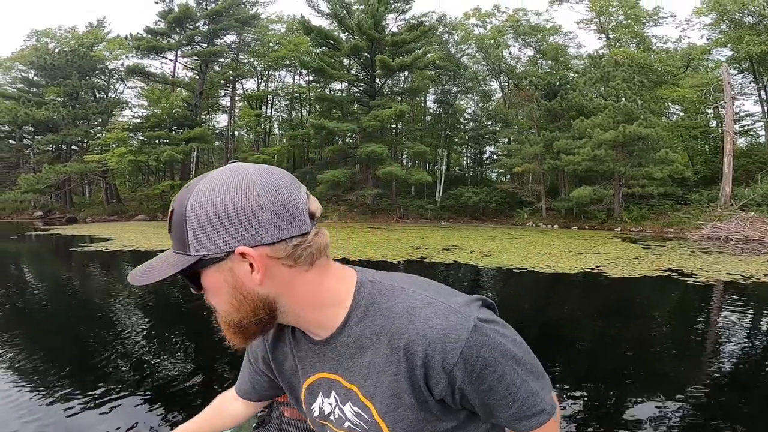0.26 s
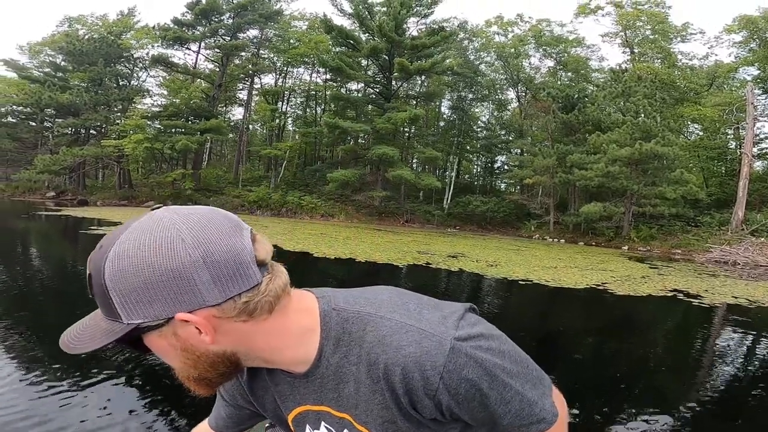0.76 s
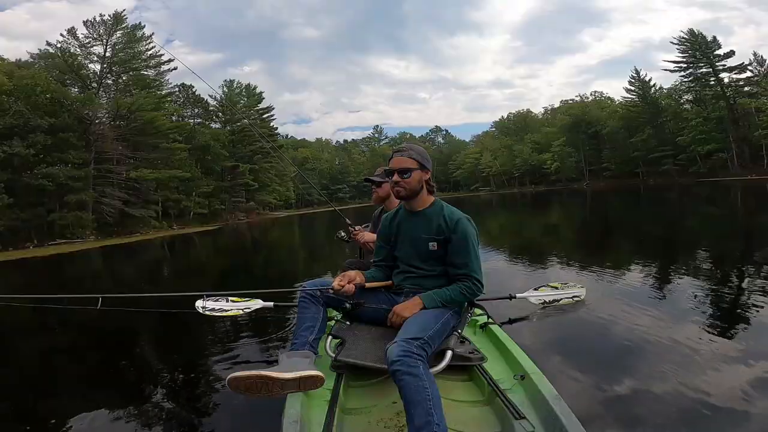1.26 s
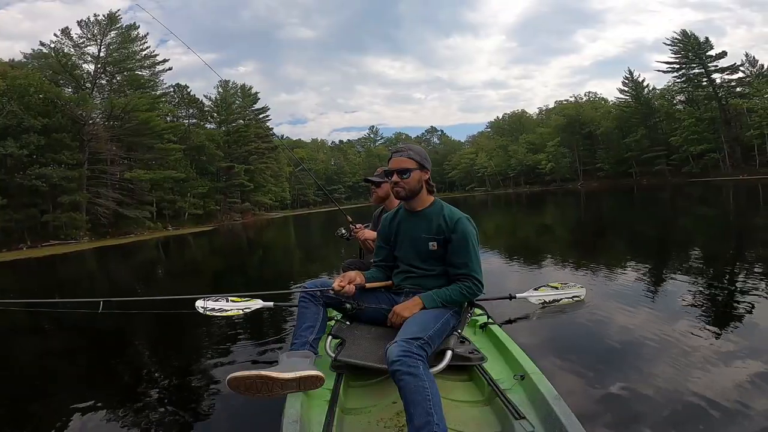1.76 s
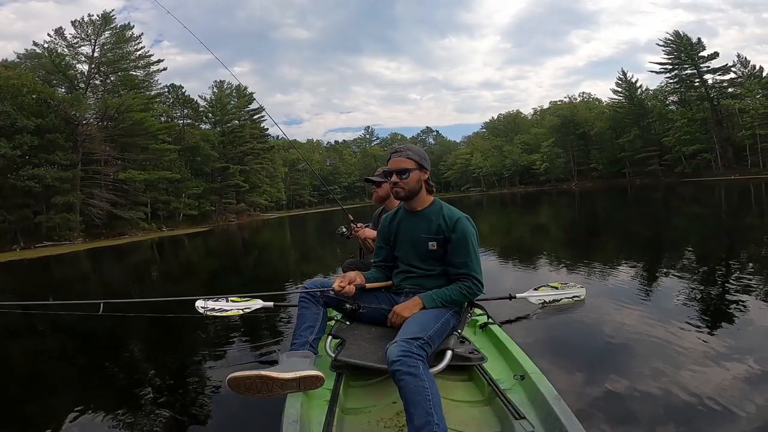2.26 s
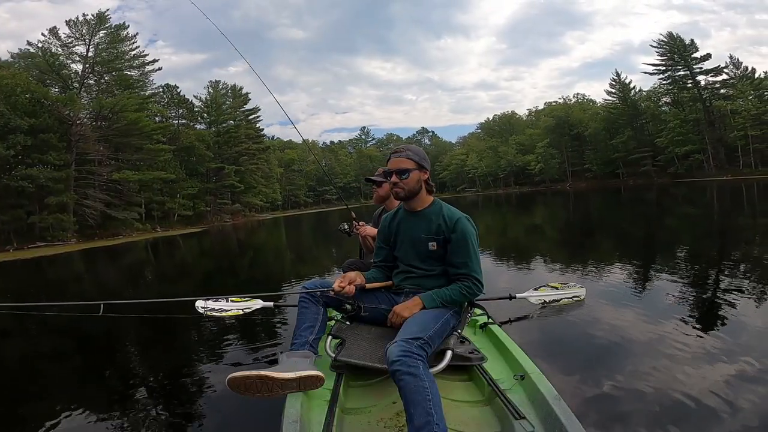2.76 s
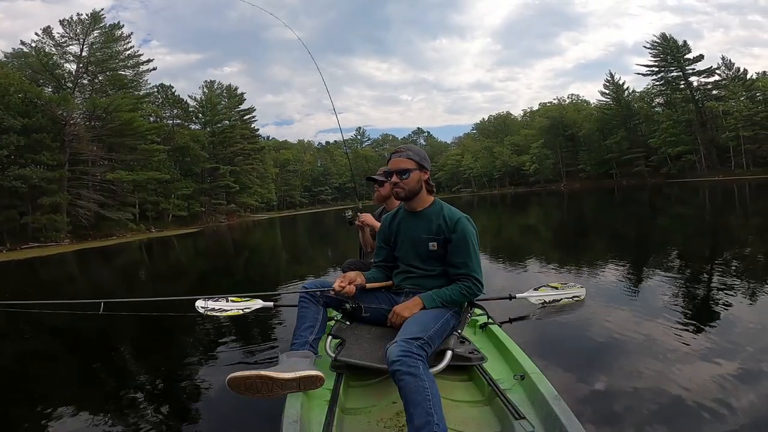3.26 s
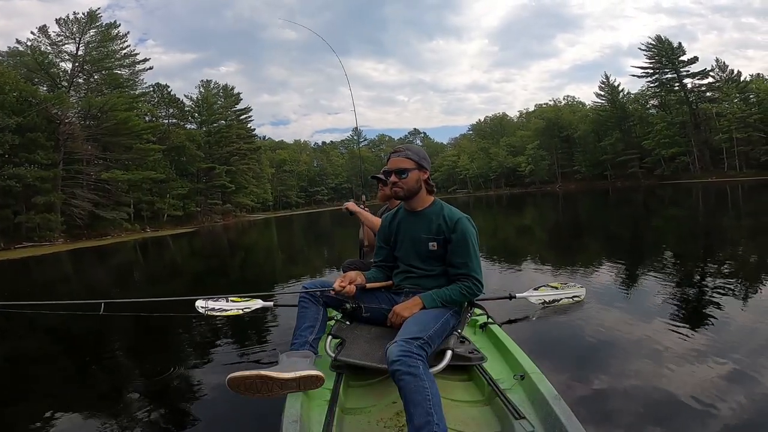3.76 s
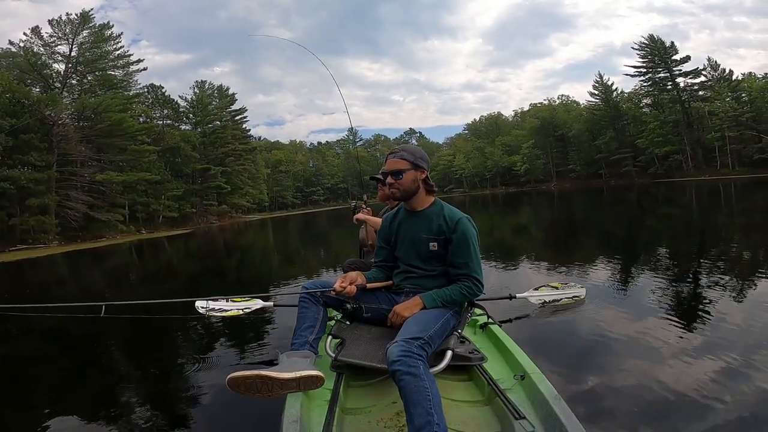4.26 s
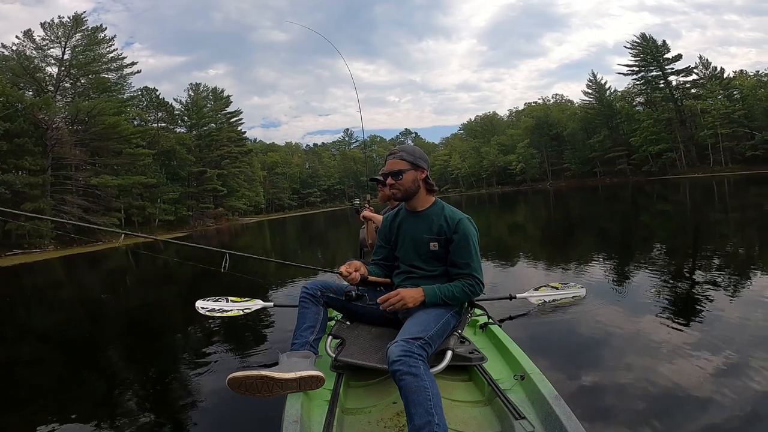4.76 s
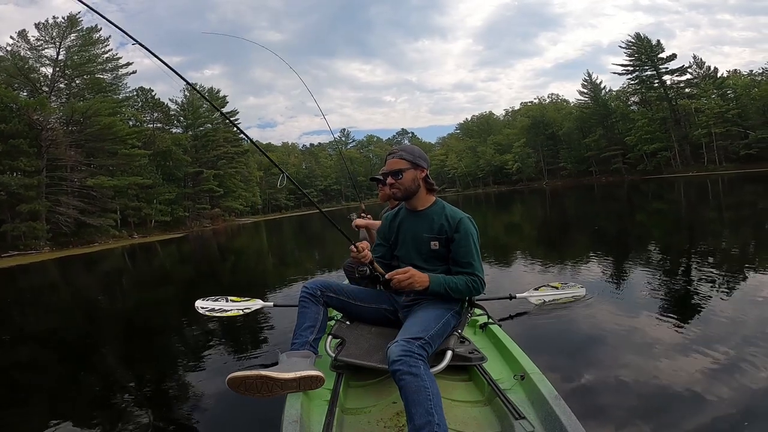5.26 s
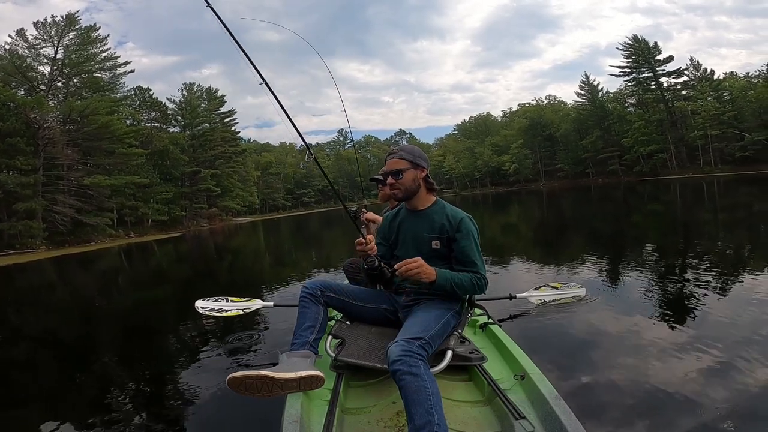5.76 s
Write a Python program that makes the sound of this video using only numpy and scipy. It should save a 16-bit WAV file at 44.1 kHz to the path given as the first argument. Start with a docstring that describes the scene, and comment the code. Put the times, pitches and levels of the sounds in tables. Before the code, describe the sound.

Close to the microphone, a hand and fish stir lake water beside a plastic kayak: dull hull bumps, bubbling slosh, then a sharp low plunge and a wet creak. An abrupt cut leads to quiet outdoor woods with a trilling cricket, faint bird chirps, a thin whistle and low wind puffs. Later a fishing reel clicks irregularly, line rasps through guides and tackle knocks on hollow plastic.

```python
"""Near scene: beside a plastic kayak on a still lake a hand lowers a fish into the water. The hull is bumped,
shaped noises surge, slosh and spray, gliding sines gurgle, the fish dives and wet skin creaks on the hull.
Farther scene, after a cut at 1.287 s: a trilling cricket, bird chirps and a thin whistle, low-noise wind puffs,
a reel whose pawl clicks and rings damped modes, line hissing through the rod guides, and tackle knocking on
hollow plastic. A steady hush of woods lies under both scenes."""
import sys
import numpy as np
from scipy import signal
from scipy.fft import rfft, irfft, next_fast_len
from scipy.io import wavfile
from scipy.ndimage import uniform_filter1d, map_coordinates

SR = 44100
rng = np.random.default_rng(int(sys.argv[2]) if len(sys.argv) > 2 else 0)


def to_wav(s):
    """Save 16-bit WAV."""
    ch = np.atleast_2d(s).T  # columns
    pcm = np.round(np.clip(ch, -1, 1) * 32767)  # PCM
    wavfile.write(sys.argv[1], SR, pcm.astype(np.int16))


N = 265305
T = np.arange(N) / SR
CUT_S = 1.287  # the near scene ends here


def amp(db):
    """Amplitude factor of a level in dB."""
    return 10 ** (np.asarray(db) / 20)


def unit(x):
    """Scale to an overall rms of 1."""
    return x / np.sqrt(np.mean(x ** 2) + 1e-20)


def along(points, hz):
    """Interpolate (Hz, value) points on a log frequency axis."""
    point_hz, value = np.transpose(points)
    return np.interp(np.log(hz + 1), np.log(point_hz + 1), value)


def curves(rows):
    """One value per sample for each column after the time."""
    time_s, *columns = np.transpose(rows)
    return [np.interp(T, time_s, column) for column in columns]


def wobble(rate_hz):
    """A smooth random curve with rate_hz knots a second."""
    knots = rng.standard_normal(int(N * rate_hz / SR) + 4)
    return map_coordinates(knots, [T * rate_hz])


def filtered(x, response):
    """Apply a response given as a function of frequency."""
    size = next_fast_len(x.shape[-1] + 8192)
    spectrum = rfft(x, size) * response(np.fft.rfftfreq(size, 1 / SR))
    return irfft(spectrum, size)[..., :x.shape[-1]]


def noise(spectrum, patchy_db):
    """Two unrelated noises, joint rms 1, that share time-frequency patches of random gain."""
    z = signal.stft(rng.standard_normal((2, N + 512)), nperseg=512)[2]
    field = uniform_filter1d(rng.standard_normal(z.shape[1:]), size=5, axis=0)
    field = uniform_filter1d(field, size=7, axis=1)
    pair = signal.istft(z * amp(patchy_db * unit(field)), nperseg=512)[1][:, :N]
    return unit(filtered(pair, lambda hz: amp(along(spectrum, hz))))


def spread(pair, alike):
    """Mix two noises into left and right with the given (Hz, likeness)."""
    def mid_side(hz):
        angle = np.arccos(np.clip(along(alike, hz), -1, 1)) / 2
        return np.array([np.cos(angle), np.sin(angle)])

    mid, side = filtered(pair, mid_side)
    return np.array([mid + side, mid - side])


def grainy(depth_db, rate_hz):
    """A fast spiky gain of rms 1: drops and slips stand out of the noise."""
    return unit(amp(depth_db * wobble(rate_hz)))


def place(x, pan_db, lag=0):
    """Left and right of one source: pan_db is left over right, left lags by some samples."""
    return np.array([np.roll(x, lag) * amp(pan_db / 2), x * amp(-pan_db / 2)])


def add(out, start_s, x):
    """Mix x into out at start_s."""
    part = out[..., round(start_s * SR):][..., :x.shape[-1]]
    part += x[..., :part.shape[-1]]


def ring(modes, t, scatter_db, attack_s):
    """Sum of damped (Hz, dB, t60 s) modes, struck at new strengths each time."""
    total = np.zeros(len(t))
    for hz, db, t60_s in modes:
        struck_db = db + scatter_db * rng.standard_normal()
        total += amp(struck_db - 60 * t / t60_s) * np.sin(2 * np.pi * hz * t)
    return total * (1 - np.exp(-t / attack_s))


def burst(spectrum, t60_s, tilt_db, alike, attack_s):
    """A decaying stereo puff of coloured noise; tilt_db per octave bends the treble."""
    t = np.arange(SR // 8) / SR

    def colour(hz):
        return amp(along(spectrum, hz) + tilt_db * np.log2(hz / 3000 + 0.39))

    mid, side = filtered(rng.standard_normal((2, len(t))), colour)
    side = (1 - alike) * side
    mix = unit(np.array([mid + side, mid - side]))
    return mix * amp(-60 * t / t60_s) * (1 - np.exp(-t / attack_s))


def water():
    """Surge, slosh and spray of the stirred surface, with ringing air pockets, slaps and a steady hiss."""
    # relative spectra: hz, level_db
    surge_spectrum = [(15, -32), (25, -15), (92, -3.5), (214, -9), (303, -7.5), (400, -21), (520, -48),
                      (880, -120)]
    slosh_spectrum = [(88, -22), (150, -1.5), (306, 5), (648, -8), (821, -10), (1140, -18), (1510, -8),
                      (3500, -16.5), (4550, -28), (7700, -120)]
    spray_spectrum = [(1180, -38), (2000, -7), (2450, -5.5), (2790, -7), (4200, -9), (5530, -10.5),
                      (6950, -13.5), (12300, -35.5), (14000, -60)]
    slap_spectrum = [(240, -42.5), (400, 2.5), (676, -14), (1580, -2.5), (2430, -7.5), (2750, -11),
                     (3580, -5), (5430, -12), (7510, -16.5), (16000, -47.5)]
    hiss_spectrum = [(3000, -80), (3650, -14), (3900, 0), (4400, -1), (4800, -16), (6000, -80)]  # near 4 kHz
    # left-right likeness: hz, likeness
    water_alike = [(60, 0.88), (240, 1), (950, 0.45), (3770, 0.48), (15000, 0.087)]
    # air pockets that ring as they close: start_s, level_db, pitch_hz, relative pitch rise per t60, t60_s
    bubbles = [(0.214, -44, 192, -0.0089, 0.11), (.27, -52, 737, -0.27, 0.22),
               (.335, -40, 595, 0.39, 0.064), (.355, -35.5, 1147, 0.34, 0.051),
               (.430, -29.5, 327.4, 0.079, 0.38), (.430, -39.5, 307.3, 0.046, 0.46),
               (.518, -42, 362, -0.052, 0.092), (.555, -45, 774, 0.11, 0.13),
               (0.595, -32, 1250, 0.77, 0.033), (.684, -25.5, 440, -0.035, 0.071),
               (.73, -48, 445, 0.32, 0.3), (.796, -43.5, 723, 1.6, .04), (.81, -39.5, 1260, 0.47, 0.047),
               (.82, -35.5, 3200, 0.46, 0.019), (.885, -24.5, 1070, -0.077, 0.035),
               (.886, -14.5, 165.7, -0.18, 0.087), (0.912, -16.5, 103.4, -0.24, 0.1),
               (.935, -28, 279, 0.31, 0.079), (0.938, -14, 69, -0.63, 0.063), (0.967, -14, 47, .3, 0.092),
               (1.071, -45, 300, 0.041, 0.18)]
    # tail and hand slap the surface: start_s, level_db, treble_db_per_octave
    slaps = [(0.0144, -31, -8), (0.1496, -45.5, -0.5), (0.3432, -38.5, -12.5), (0.39, -43, -5.5),
             (0.4155, -46, -6), (0.4284, -31, -5.5), (0.4444, -40.5, -8), (0.4733, -40, -7.5),
             (0.5177, -34.5, -5), (0.5503, -39.5, -7), (0.5781, -42.5, -7), (0.6814, -37, -7.5),
             (0.8748, -42, -2), (0.8837, -29.5, -6.5), (0.9102, -18, 1.5), (0.9785, -36.5, -5),
             (1.008, -46, 0.5), (1.0748, -44.5, -1), (1.0855, -44, -1), (1.1094, -51, 1)]
    hiss_db, slap_t60_s = -64.5, 0.042

    surge, slosh, spray = stirring()
    bed = surge * noise(surge_spectrum, patchy_db=5.0)
    bed += slosh * grainy(depth_db=0.5, rate_hz=38) * noise(slosh_spectrum, patchy_db=4.5)
    bed += spray * grainy(depth_db=1.0, rate_hz=230) * noise(spray_spectrum, patchy_db=2.5)
    bed += amp(hiss_db) * noise(hiss_spectrum, patchy_db=2.0)
    out = spread(bed, water_alike) * amp([[1.2], [-1.2]])
    small_bubbles = gurgle(count=1200, median_hz=1510, cycles=8.1, scatter_db=2.0)
    out += place(amp(-3.5) * slosh * small_bubbles, pan_db=5.0)

    t = np.arange(SR // 4) / SR
    for start_s, db, hz, rise, t60_s in bubbles:
        # the pocket shrinks or opens, its pitch glides
        phase = 2 * np.pi * hz * (t + rise * t * t / (2 * t60_s))
        tone = amp(db - 60 * t / t60_s) * np.sin(phase) * (1 - np.exp(-t * hz / 0.5))
        add(out, start_s, place(tone, pan_db=2.1))
    for start_s, db, treble_db in slaps:
        slap = burst(slap_spectrum, slap_t60_s, treble_db, alike=0.55, attack_s=0.00053)
        add(out, start_s, amp(db) * slap * amp([[1.3], [-1.3]]))
    return out * np.clip((CUT_S - T) / 0.013, 0, 1)


def stirring():
    """Gains of surge, slosh and spray: one stirring level, the dive and the swell after it."""
    # hand and fish work the surface: time_s, slosh_db
    stir_levels = [(0, -63), (.13, -67.5), (.3, -55), (.41, -53), (.52, -54.5), (.6, -46), (.67, -45.5),
                   (.72, -56), (.86, -61), (1.04, -69), (1.09, -53.5), (1.17, -58.5), (1.25, -55.5)]
    # level at a slosh of -55 dB; dB per dB of slosh
    surge_db, surge_follows = -63, 0.27
    spray_db, spray_follows = -61, 0.21
    dive_s, rise_s = 0.89, 0.011  # full strength; time to rise 20 dB
    dive_levels = [(-26, 0.26), (-39, 0.4), (-48, 0.55)]  # surge, slosh, spray: peak_db, t60_s
    swell_db, swell_t60_s = -40.5, 1.38  # the low surge rolls on

    slosh_db, = curves(stir_levels)
    above_db = slosh_db + 55
    stir = amp([surge_db + surge_follows * above_db, slosh_db, spray_db + spray_follows * above_db])
    after_s = np.maximum(T - dive_s, 0)
    rise_db = 20 * np.minimum(T - dive_s, 0) / rise_s
    dive = amp([db + rise_db - 60 * after_s / t60_s for db, t60_s in dive_levels])
    swell = amp(swell_db + rise_db - 60 * after_s / swell_t60_s)
    return np.hypot(stir, dive + swell * [[1], [0], [0]])


def gurgle(count, median_hz, cycles, scatter_db):
    """Many small bubbles of rising pitch at chance times and pitches, rms 1 over the near scene."""
    draw, t = rng.random((count, 3)), np.arange(1024) / SR
    pitch_hz = median_hz * np.exp(0.536 * rng.standard_normal((count, 1)))
    turns = pitch_hz * t
    strength = amp(-scatter_db * np.log(draw[:, 1:2]))
    envelope = turns * np.exp(-3 * turns / cycles)
    tones = strength * np.sin(2 * np.pi * turns * (1 + 0.11 * turns / cycles)) * envelope
    where = (draw[:, :1] * CUT_S * SR).astype(int) + np.arange(len(t))
    total = np.bincount(where.ravel(), tones.ravel(), N)
    return total / np.std(total[:int(CUT_S * SR)])


def hull():
    """Dull noise bumps with a hard edge, and a creak of stick-slip pulses that push to and fro in turn."""
    # bumps: start_s, level_db, left_over_right_db, t60_s, hard_edge_db re level
    bumps = [(.011, -29.5, 3, 0.1, -13), (0.153, -32, 2.5, 0.096, -22), (3.009, -48.5, -1, 0.13, 2.5)]
    # relative spectra of hull, hard edge and creak: hz, level_db
    hull_spectrum = [(60, -44), (110, -11.5), (300, 7.5), (520, 3.5), (990, -18), (1460, -15.5),
                     (2300, -11.5), (3100, -24.5), (5000, -21), (8000, -72)]
    edge_spectrum = [(300, -22), (450, -3), (900, 1), (1300, -6), (2400, -18), (6000, -31), (10000, -60)]
    creak_spectrum = [(400, -20), (570, 5), (700, -10), (1150, 8), (1530, 5), (1790, -12), (2000, 7),
                      (2250, 8), (2450, -4), (2800, 2), (3600, -5), (4100, -16), (7000, -22), (10000, -36)]
    # wet skin rubs on the hull: start_s, end_s, first_db, growth_db_per_s
    creaks = [(1.07, 1.145, -58, -20), (1.178, 1.287, -58, 30)]
    slips_per_s, fade_s = 234.5, 0.014

    out = np.zeros((2, N))
    for start_s, db, pan_db, t60_s, hard_db in bumps:
        sides = amp([[pan_db / 2], [-pan_db / 2]])
        dull = burst(hull_spectrum, t60_s, tilt_db=-1.5, alike=0.88, attack_s=0.0014)
        edge = burst(edge_spectrum, t60_s=0.057, tilt_db=-0.5, alike=0.73, attack_s=0.00029)
        add(out, start_s, amp(db) * dull * sides)
        add(out, start_s, amp(db + hard_db) * edge * sides)

    rub = np.zeros(N)
    for start_s, end_s, db, growth_db in creaks:
        fade = np.clip(np.minimum(T - start_s, end_s - T) / fade_s, 0, 1)
        rub += amp(db + growth_db * np.clip(T - start_s, 0, end_s - start_s)) * fade
    slip_count = np.floor(np.cumsum(slips_per_s * (1 + 0.004 * wobble(80))) / SR)
    slips = np.diff(slip_count, prepend=0)
    pushes = slips * (-1) ** np.cumsum(slips) * amp(2 * rng.standard_normal(N))

    def smear(hz):  # the higher, the later
        return amp(along(creak_spectrum, hz)) * np.exp(-1j * hz * hz / 2100000.0)

    return out + place(rub * unit(filtered(pushes, smear)), pan_db=6.0)


def reel():
    """The pawl snaps over a tooth and rings the spool until the next tooth damps it."""
    # spool modes: pitch_hz, level_db, t60_s
    spool_low = [(4060, -5, 0.12), (4227, 1, 0.23)]
    spool_high = [(6390, 2.5, 0.38), (6630, -2, 0.22), (10600, -14, 0.16)]
    # relative click spectrum: hz, level_db
    pawl_spectrum = [(1180, -59), (2000, -45), (2550, -10), (3680, -12.5), (4260, -5), (5350, -4.5),
                     (7060, 2), (9330, -18.5), (11900, -14), (16000, -37)]

    out, t = np.zeros((2, N)), np.arange(SR // 3) / SR
    strokes = teeth()
    ends_s = [row[0] for row in strokes[1:]] + [N / SR]
    for (start_s, db, low_db, high_db), end_s in zip(strokes, ends_s):
        damp = amp(-25 * np.clip((t - (end_s - start_s)) / 0.0052, 0, 1))
        tone = amp(low_db) * ring(spool_low, t, scatter_db=1.5, attack_s=0.00043)
        tone += amp(high_db) * ring(spool_high, t, scatter_db=3.5, attack_s=0.0016)
        add(out, start_s, place(tone * damp, pan_db=-3.0, lag=1))
        click = burst(pawl_spectrum, t60_s=0.0075, tilt_db=0.0, alike=0.44, attack_s=0.00044)
        add(out, start_s, amp(db) * click * amp([[-3.2], [3.2]]))
        boat_answer = burst(pawl_spectrum, t60_s=0.025, tilt_db=-4.5, alike=0.57, attack_s=0.00028)
        add(out, start_s, amp(db - 11.5) * boat_answer)
    return out


def teeth():
    """All pawl strokes in time order: single teeth, and even runs that grow louder as the spool spins."""
    # single teeth: start_s, click_db, low_ring_db, high_ring_db
    clicks = [(3.397, -57, -90, -90), (3.4341, -37, -61, -55), (3.5227, -35.5, -52, -63.5),
              (3.75, -35.5, -64.5, -62.5), (3.8634, -38.5, -57.5, -61.5), (3.9433, -36.5, -50, -80),
              (3.9544, -43, -49.5, -70), (3.9804, -45, -58, -80), (3.9955, -35, -62, -66),
              (4.0217, -53, -66, -65), (4.0464, -34, -57, -54.5), (4.1274, -35, -48.5, -58),
              (4.1554, -55, -66, -72), (4.2038, -36, -52.5, -70), (4.2378, -51, -78, -74),
              (4.2778, -35.5, -66, -68), (4.4071, -35, -64, -61), (4.4573, -36.5, -55, -62),
              (4.616, -43, -58.5, -54), (4.8192, -38, -75, -82), (4.881, -35.5, -62, -68),
              (4.9322, -33.5, -52, -58), (4.9833, -32, -53, -53.5), (5.0194, -46, -64, -61),
              (5.0442, -48, -78, -64), (5.208, -34, -46.5, -54), (5.4213, -37, -52.5, -59.5),
              (5.5019, -40, -63, -70), (5.5648, -36, -54, -64), (5.5864, -46, -60, -77),
              (5.6027, -46, -60, -71), (5.6328, -34, -54.5, -65), (5.9582, -47, -77, -81)]
    # even runs: first_s, last_s, first_db, last_db, low_ring_db, high_ring_db
    even_runs = [(4.312, 4.383, -34.5, -32, -51.5, -55), (5.356, 5.4024, -54, -39, -73, -71)]
    run_teeth = (6, 5)

    strokes = list(clicks)
    for (first_s, last_s, first_db, last_db, low_db, high_db), count in zip(even_runs, run_teeth):
        times_s = np.linspace(first_s, last_s, count)
        levels_db = np.linspace(first_db, last_db, count)
        strokes += [(start_s, db, low_db, high_db) for start_s, db in zip(times_s, levels_db)]
    return sorted(strokes)


def line():
    """Wet line rasps through the guides while the pawl skims small teeth at chance moments."""
    # relative spectra of rasp and skims: hz, level_db
    guide_spectrum = [(700, -48), (1200, -15.5), (2000, -4.5), (2800, 0), (3600, -4.5), (4300, -0.5),
                      (5300, -7.5), (6700, -2.5), (8100, -18.5), (10900, -19.5), (13500, -30), (14200, -60)]
    skim_spectrum = [(2000, -40), (3500, -14), (5500, -6), (6900, 0), (8000, -10), (9500, -24),
                     (13000, -34), (15000, -60)]
    # pulls: start_s, full_speed_s, slowing_s, end_s, full_speed_db
    pulls = [(3.717, 3.952, 4.287, 4.54, -56), (4.69, 5.064, 5.53, 5.596, -57)]
    pull_range_db = 20.5  # start and end lie this far under full speed
    skims_per_s, skim_scatter_db, skim_db = 90, 3.5, -7  # skim_db: against the rasp

    rasp = grainy(depth_db=2, rate_hz=230) * noise(guide_spectrum, patchy_db=3.0)
    rasp = spread(rasp, [(1400, 0.69), (3000, 0.86), (7000, 0.29)]) * amp([[-2.2], [2.2]])
    strength = amp(skim_scatter_db * np.clip(rng.standard_normal(N), -2, 2))
    ticks = (rng.random(N) < skims_per_s / SR) * strength
    snap = burst(skim_spectrum, t60_s=0.006, tilt_db=0, alike=0.63, attack_s=0.0002) * amp([[-3], [3]])
    skims = unit(signal.fftconvolve(ticks[None], snap, axes=1)[:, :N])
    speed = np.zeros(N)
    for *times_s, db in pulls:
        under_db = pull_range_db * (np.interp(T, times_s, [0, 1, 1, 0]) - 1)
        speed += amp(db + under_db) * (T > times_s[0]) * (T < times_s[-1])
    return speed * amp(0.83 * wobble(8)) * (rasp + amp(skim_db) * skims)


def tackle():
    """A knock lands, bounces 3.3 ms later and rings the plastic; hard contacts wake the modes above 3 kHz."""
    # knocks on hollow plastic: start_s, level_db, brightness_db, bounce_db re first touch
    knocks = [(3.786, -51, -4, 5), (4.7033, -36, -2, -1), (4.7498, -45.5, -7, -9),
              (4.829, -35.5, -8.5, 2.5), (5.0952, -59, 1, 7.5), (5.1642, -41.5, -33, -3.5),
              (5.2068, -41.5, -29, 6), (5.2504, -39, -33, 1.5)]
    # plastic modes: pitch_hz, level_db, t60_s
    plastic_modes = [(330, -15, .05), (420, -13, .05), (560, -15, .045), (950, -13, .04), (1235, -10, .045),
                     (1340, -10, .04), (1522, 0, .062), (1620, -1, .05), (1825, 0, .05), (1950, -3, .04),
                     (2390, -6, .04), (2600, -10, .03), (2760, -10, .03), (3645, -2, .03), (4300, 1, .025),
                     (5190, -9, .025)]
    # soft scuffs of gear: start_s, level_db, t60_s, treble_db_per_octave
    scuffs = [(3.659, -49.5, 0.047, 6), (3.7868, -37.5, 0.054, 1), (4.104, -50.5, 0.05, -27),
              (4.429, -52.5, 0.078, -31), (4.544, -51.5, 0.069, -28), (4.6215, -42.5, 0.085, 2.5),
              (4.76, -42, 0.046, 10.5), (5.77, -47.5, 0.039, 11.5), (5.7766, -52, 0.042, 5)]
    # small pings of gear: start_s, level_db, pitch_hz, t60_s
    pings = [(4.108, -53, 1164, 0.079), (4.762, -35.5, 4240, 0.024), (5.478, -39, 1517, 0.067),
             (5.603, -34, 2990, 0.014), (5.777, -42, 3440, 0.016), (5.96, -60.5, 1296, .4)]
    # relative spectra of the hull's answer and the scuffs: hz, level_db
    clack_spectrum = [(200, -63), (350, 2.5), (800, -15), (1600, 7.5), (2500, -6), (4500, -20.5),
                      (9000, -33.5), (14000, -70)]
    scuff_spectrum = [(300, -24), (900, -6.5), (1500, 6.5), (4000, 0), (8000, -19.5), (14000, -57)]
    clack_db = 4  # hull's answer re knock

    out, t = np.zeros((2, N)), np.arange(SR // 8) / SR
    for start_s, db, bright_db, bounce_db in knocks:
        for delay_s, touch_db in ((0, db), (0.0033, db + bounce_db)):
            modes = [(hz * (1 + 0.013 * rng.standard_normal()), level_db + bright_db * (hz > 3000), t60_s)
                     for hz, level_db, t60_s in plastic_modes]
            tone = ring(modes, t, scatter_db=2.5, attack_s=0.0015)
            add(out, start_s + delay_s, amp(touch_db) * place(tone, pan_db=-1.0, lag=2))
        clack = burst(clack_spectrum, t60_s=0.088, tilt_db=-0.5, alike=0.72, attack_s=0.0014)
        add(out, start_s, amp(db + clack_db) * clack)
    for start_s, db, t60_s, treble_db in scuffs:
        scuff = burst(scuff_spectrum, t60_s, treble_db, alike=0.6, attack_s=0.00066)
        add(out, start_s, amp(db) * scuff)
    for start_s, db, hz, t60_s in pings:
        ping = ring([(hz, db, t60_s)], t, scatter_db=0.5, attack_s=0.00058)
        add(out, start_s, place(ping, pan_db=1.5, lag=2))
    return out


def bird():
    """Four gliding sine chirps and one thin, mostly rising whistle, far off."""
    # whistle: time_s, pitch_hz, level_db
    whistle = [(1.74, 3560, -86), (1.78, 3520, -85), (1.86, 3600, -90), (1.95, 3830, -81),
               (2.05, 3890, -77), (2.2, 4120, -78), (2.35, 4185, -80), (2.5, 4130, -87)]
    # chirps: start_s, start_hz, end_hz, length_s
    chirps = [(1.528, 4420, 4400, .03), (1.548, 4300, 3950, .015), (1.608, 4600, 4580, 0.027),
              (1.68, 4050, 3750, 0.028)]

    pitch_hz, level_db = curves(whistle)
    sounding = (T > whistle[0][0]) & (T < whistle[-1][0])
    gain = sounding * np.sqrt(2) * amp(level_db + 2.0 * wobble(29.8))
    tone = gain * np.sin(2 * np.pi * np.cumsum(pitch_hz) / SR)
    for start_s, start_hz, end_hz, length_s in chirps:
        glide_hz = np.linspace(start_hz, end_hz, int(length_s * SR))
        chirp = np.hanning(len(glide_hz)) * np.sin(2 * np.pi * np.cumsum(glide_hz) / SR)
        add(tone, start_s, amp(-72) * chirp)
    return place(tone, pan_db=3.0, lag=2)


def cricket():
    """74.1 wing strokes a second in phrases of seven, each sliding down in pitch, over a far chorus."""
    # strength of the seven strokes of a phrase: level_db
    wingbeats = [-18, 2, -8, 3, -1, 1.5, 2.5]
    # relative spectrum of far crickets: hz, level_db
    chorus_spectrum = [(4000, -90), (4700, -40), (5100, -16), (5380, -8), (5550, 0), (5750, -8),
                       (6100, -32), (7000, -90)]
    left_lead_rad = 2.65

    strokes = (T - 1.4405) * 74.1
    number, within = np.floor(strokes).astype(int), strokes % 1
    first = number.min()
    chance = rng.standard_normal((number.max() - first + 1, 2))[number - first]
    shape = np.sin(np.pi * np.clip(within / 0.85, 0, 1)) ** 2
    stroke_db = np.array(wingbeats)[number % len(wingbeats)]
    gain = amp(stroke_db + 1.9 * chance[:, 0] + 0.64 * wobble(1.0))
    phase = 2 * np.pi * np.cumsum(5900 - 800 * within) / SR + 1.2 * chance[:, 1]
    tone = np.sin(phase + left_lead_rad * np.array([[0.5], [-0.5]]))
    trill = amp(-62.0) * gain * shape * tone * amp([[1.2], [-1.2]])
    far = amp(-80) * noise(chorus_spectrum, patchy_db=0.7)[0]  # many more blur into a shimmer ahead
    return (trill + far) * (T > CUT_S)


def air():
    """Steady noise hush of the woods; after the cut, low-noise wind puffs that differ left to right."""
    # relative spectra of the woods from ahead and from the sides: hz, level_db
    ahead_spectrum = [(59, -49), (100, -13.5), (118, -27), (136, -3.5), (164, -0.5), (491, -12),
                      (545, -15.5), (1030, -14), (3160, -25), (5000, -28), (6380, -32.5), (12100, -48.5),
                      (12900, -44), (13400, -84)]
    side_spectrum = [(59, -65), (100, -25), (113, -24), (171, -2.5), (339, -14), (491, -14), (600, -20),
                     (1010, -18), (4050, -30), (5000, -30), (6380, -36), (11900, -48), (12900, -47.5),
                     (13400, -85)]
    # balance of the woods: hz, left_over_right_db
    woods_balance = [(60, 1), (240, -5), (950, -3), (3770, 5.5), (15000, -2)]
    # strong puffs: peak_s, level_db, left_over_right_db
    gusts = [(2.812, -43, 13.5), (3.85, -57, 8), (4.37, -53.5, 8), (4.77, -56, 11), (5.25, -63, 7),
             (5.38, -62.5, 16), (5.86, -55, 7.5)]
    # relative spectrum of the thumps: hz, level_db
    thump_spectrum = [(30, -29), (60, 3.5), (100, -5.5), (150, -45), (200, -120)]
    woods_db, breeze_db, lumpy_db = -65, -70.5, 6.5  # lumpy_db: swing of the breeze
    gust_db_per_s = 211  # slope of rise and fall
    thump_from_db, thump_growth = -32.5, 1.8  # level where thumps match the puff; dB per dB

    mid = amp(woods_db) * noise(ahead_spectrum, patchy_db=1.0)[0]
    side = amp(woods_db - 1.2) * noise(side_spectrum, patchy_db=1.3)[0]
    woods = filtered(np.array([mid + side, mid - side]),
                     lambda hz: amp(np.outer([0.5, -0.5], along(woods_balance, hz))))
    swing = wobble(8.2) + 0.56 * np.array([wobble(9), wobble(4.8)])
    gains = amp(breeze_db + lumpy_db * swing)
    for peak_s, db, pan_db in gusts:
        gains = gains + place(amp(db - gust_db_per_s * abs(T - peak_s)), pan_db)
    puffs = noise([(12, -21), (25, -2.5), (45, -8), (90, -26.5), (160, -62), (200, -120)], patchy_db=1.5)
    # strong puffs reach higher in pitch
    thump_gains = amp(thump_from_db) * (gains / amp(thump_from_db)) ** thump_growth
    thumps = thump_gains * noise(thump_spectrum, patchy_db=3.0)
    return woods + (puffs * gains + thumps) * (T > CUT_S)


def scene():
    """Sum of all sources."""
    return water() + hull() + reel() + line() + tackle() + bird() + cricket() + air()


def record(dry):
    """Keep only what lies below the band limit."""
    top_hz = 16000
    return filtered(dry, lambda hz: hz < top_hz)


dry = scene()
out = record(dry)
to_wav(out)
```